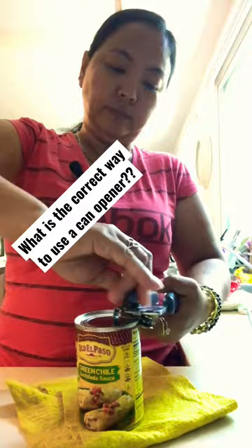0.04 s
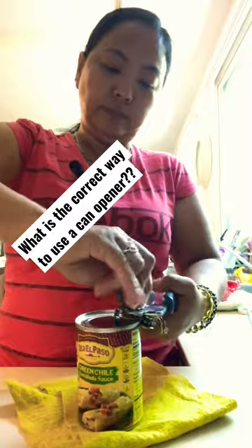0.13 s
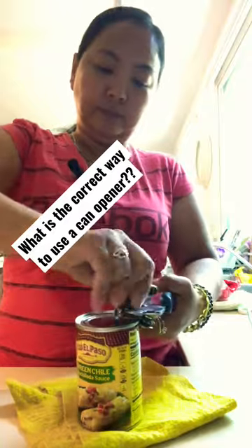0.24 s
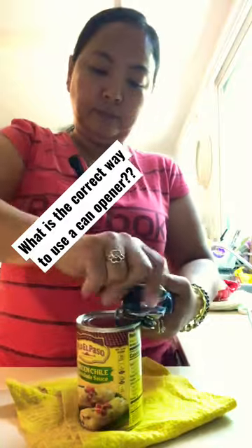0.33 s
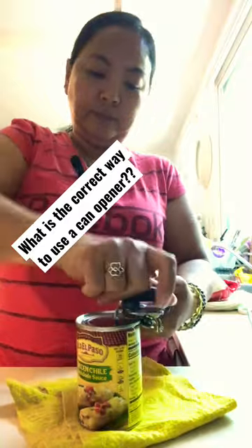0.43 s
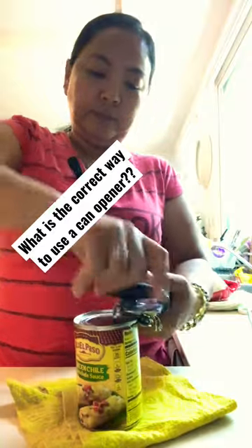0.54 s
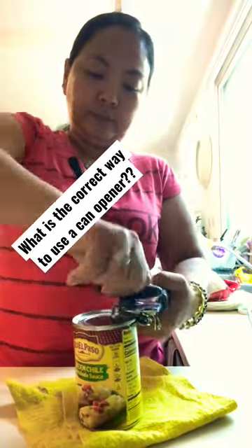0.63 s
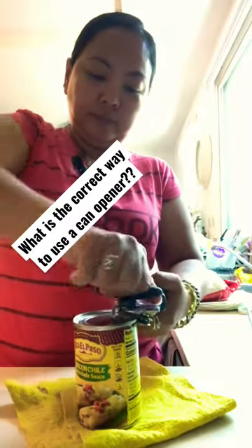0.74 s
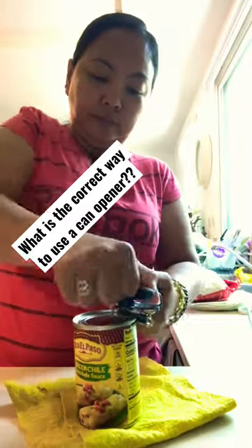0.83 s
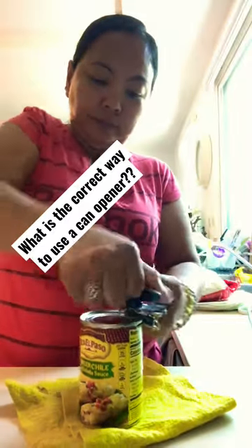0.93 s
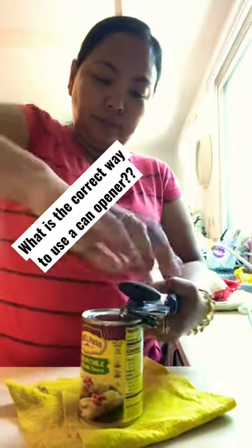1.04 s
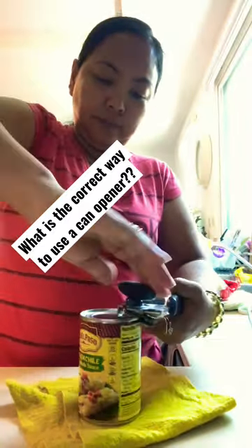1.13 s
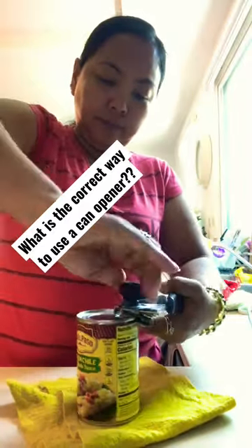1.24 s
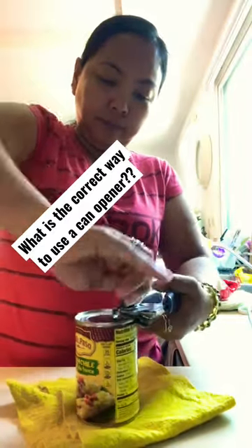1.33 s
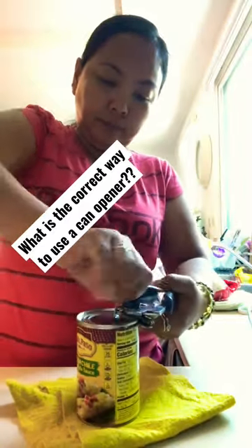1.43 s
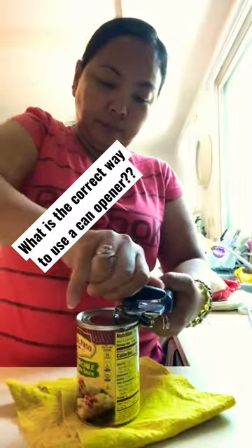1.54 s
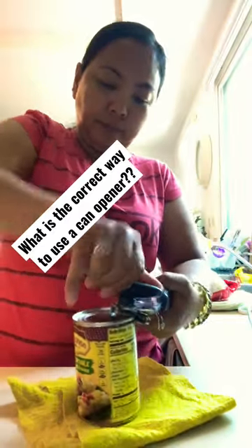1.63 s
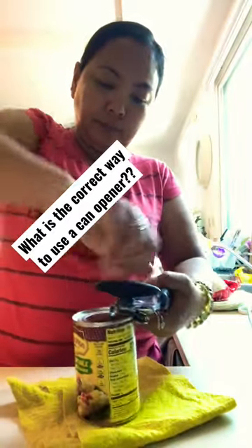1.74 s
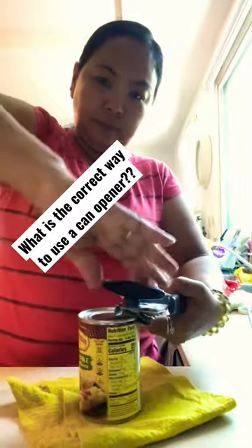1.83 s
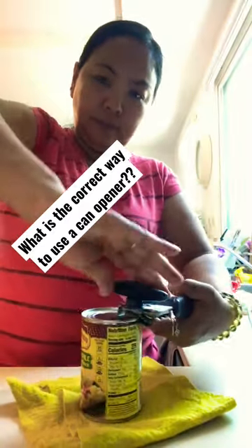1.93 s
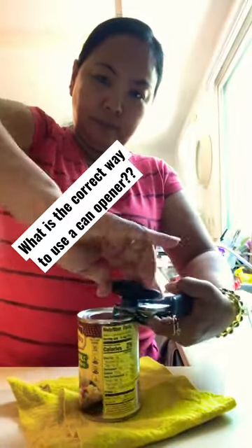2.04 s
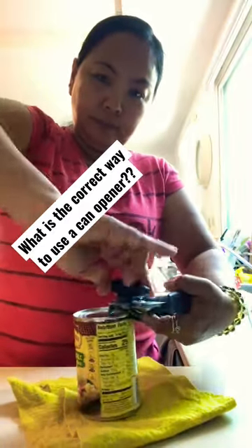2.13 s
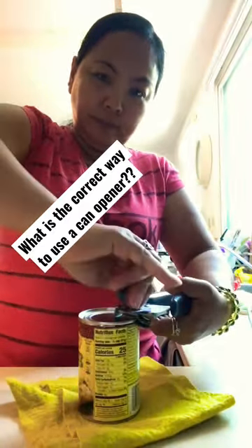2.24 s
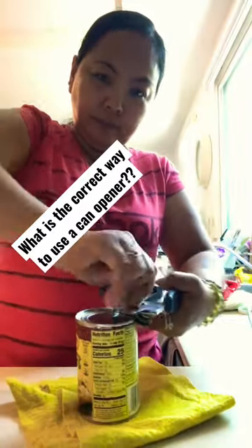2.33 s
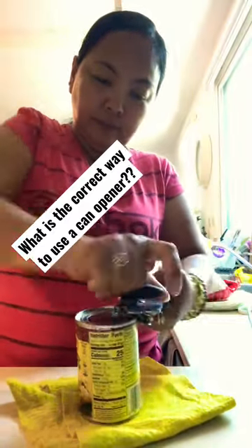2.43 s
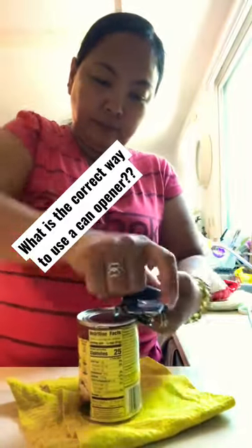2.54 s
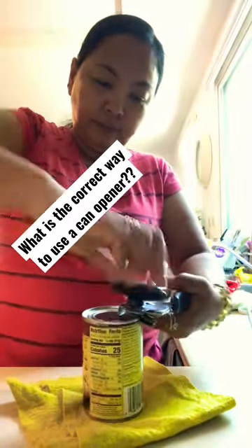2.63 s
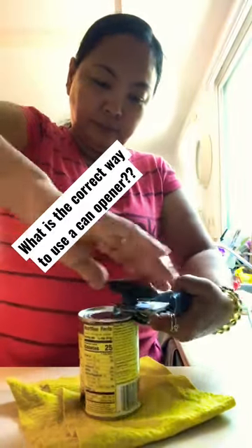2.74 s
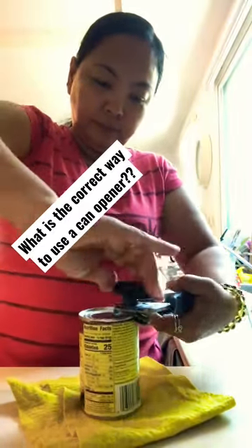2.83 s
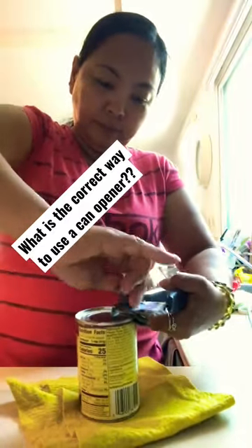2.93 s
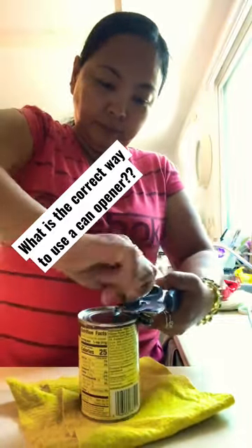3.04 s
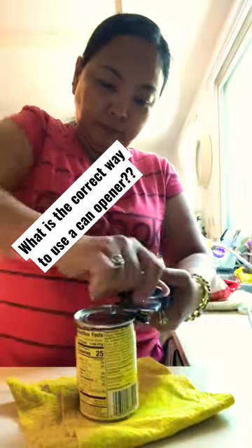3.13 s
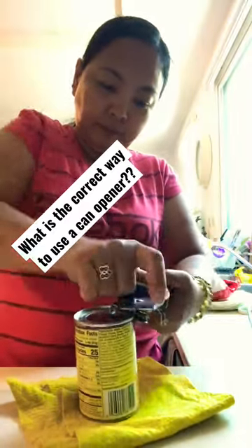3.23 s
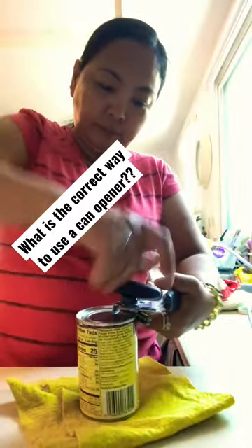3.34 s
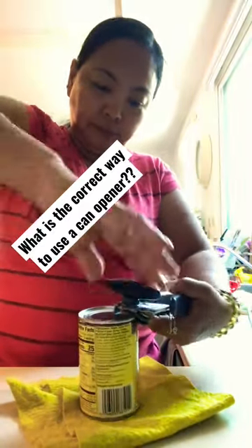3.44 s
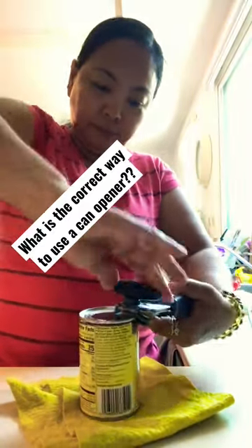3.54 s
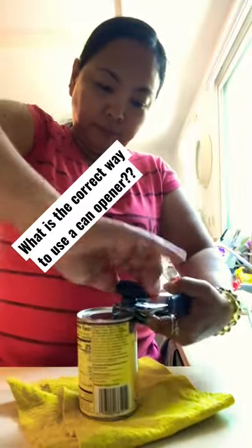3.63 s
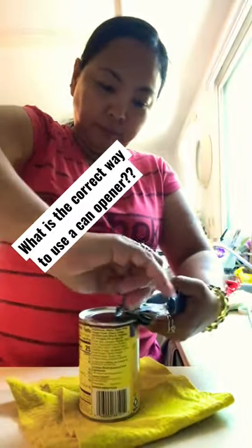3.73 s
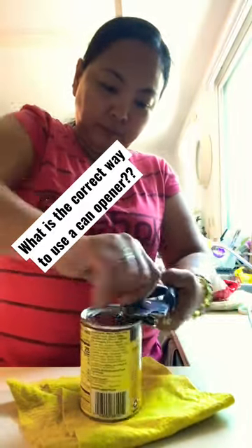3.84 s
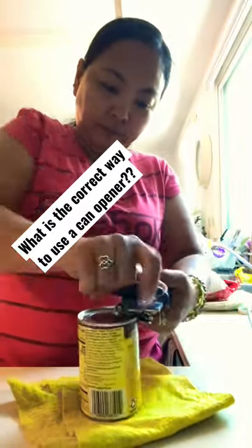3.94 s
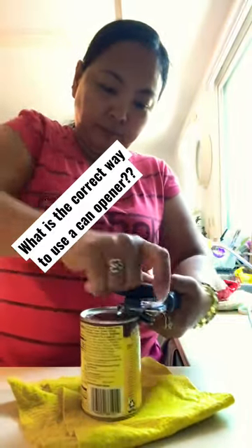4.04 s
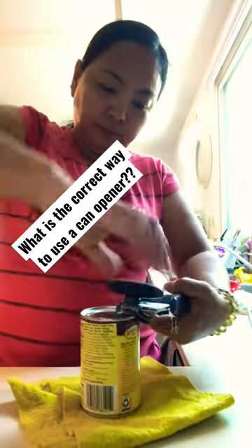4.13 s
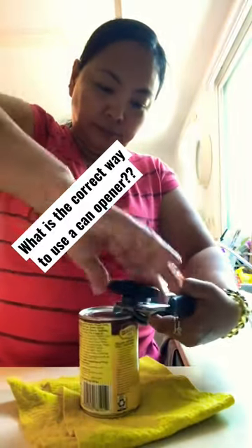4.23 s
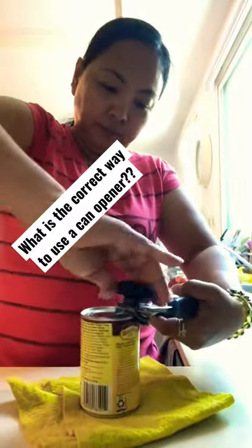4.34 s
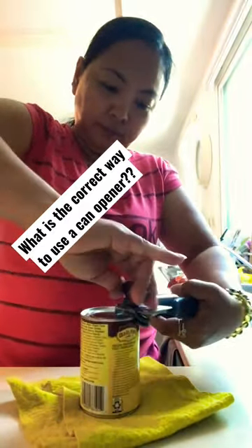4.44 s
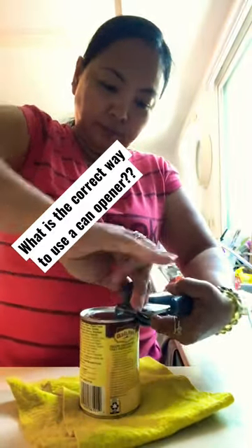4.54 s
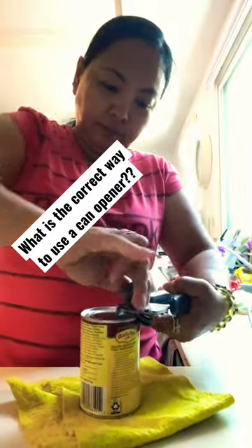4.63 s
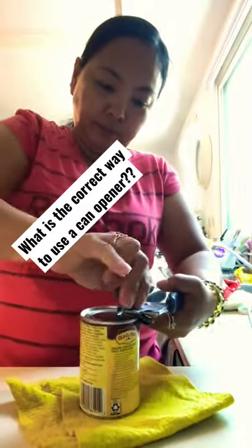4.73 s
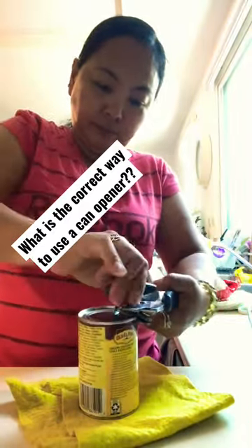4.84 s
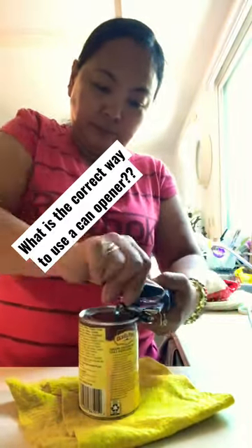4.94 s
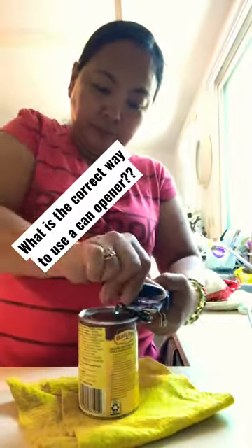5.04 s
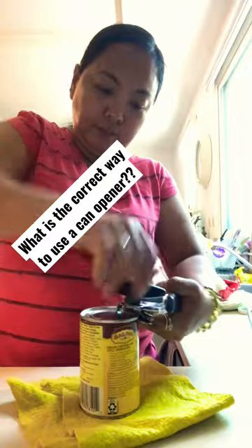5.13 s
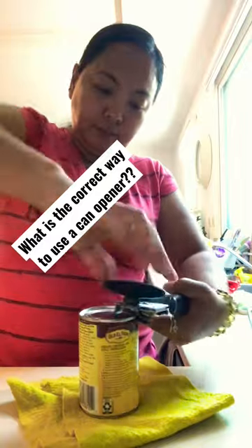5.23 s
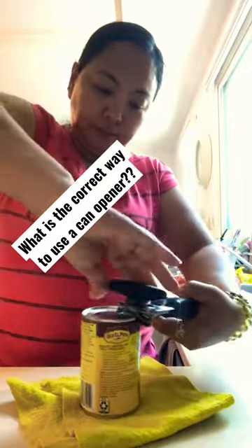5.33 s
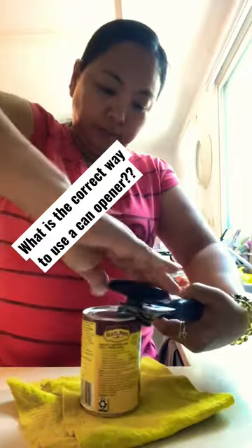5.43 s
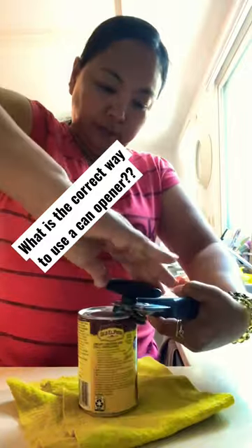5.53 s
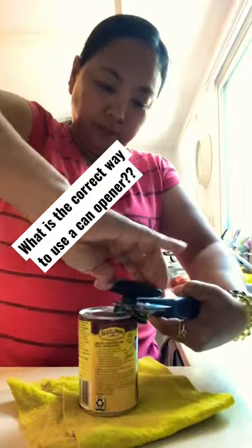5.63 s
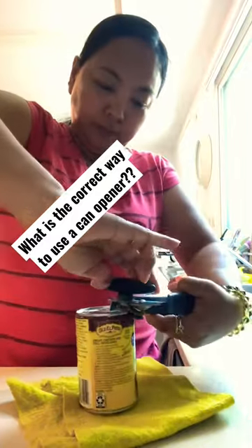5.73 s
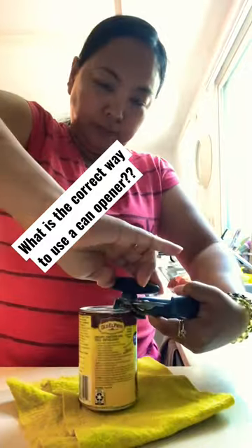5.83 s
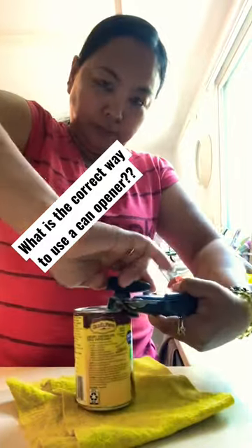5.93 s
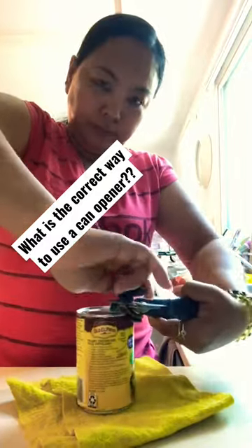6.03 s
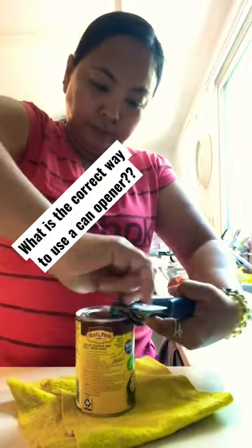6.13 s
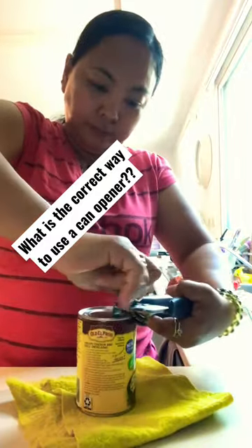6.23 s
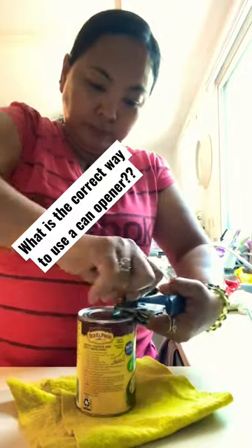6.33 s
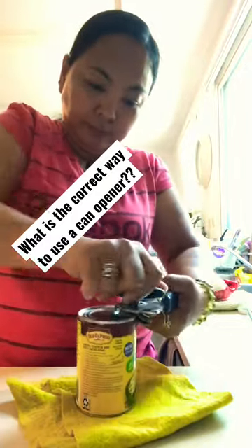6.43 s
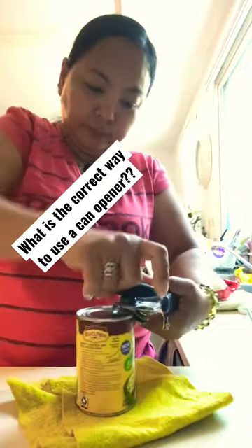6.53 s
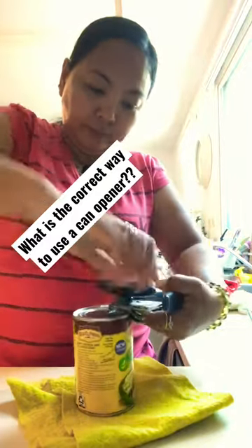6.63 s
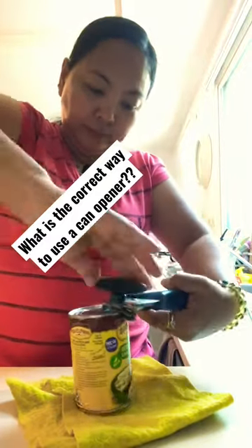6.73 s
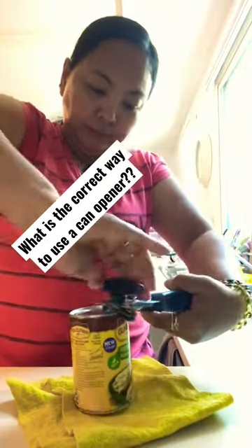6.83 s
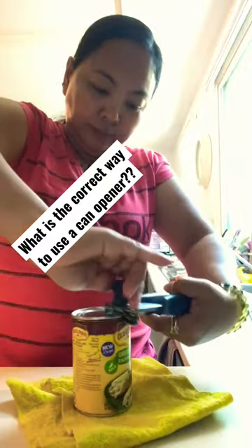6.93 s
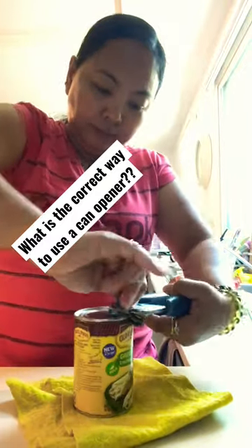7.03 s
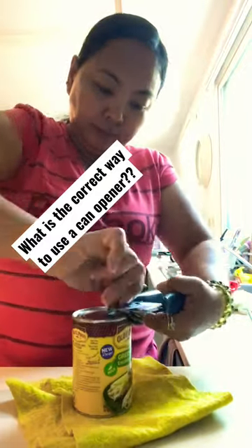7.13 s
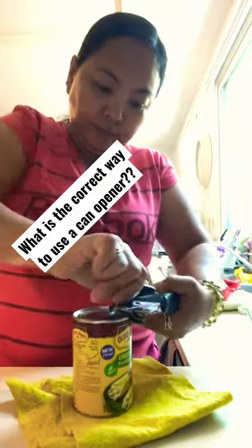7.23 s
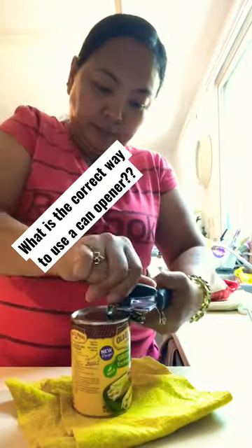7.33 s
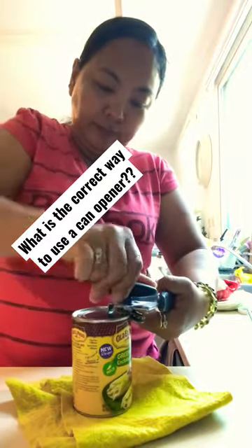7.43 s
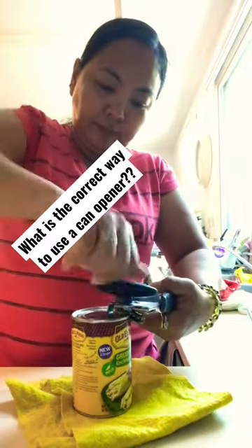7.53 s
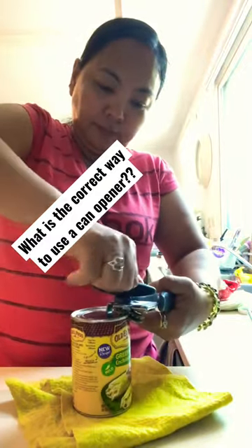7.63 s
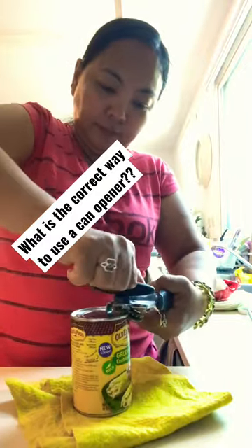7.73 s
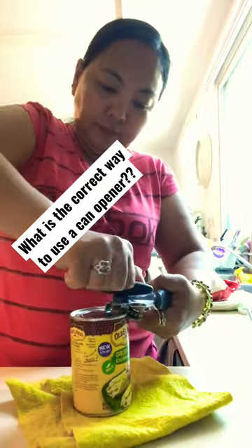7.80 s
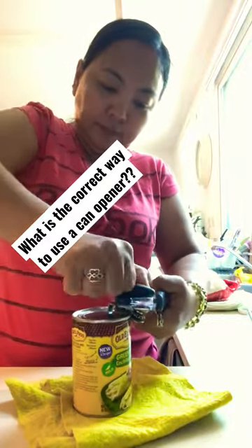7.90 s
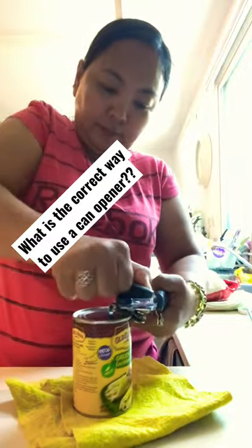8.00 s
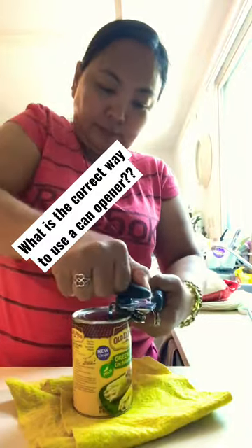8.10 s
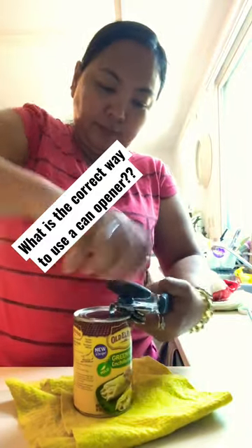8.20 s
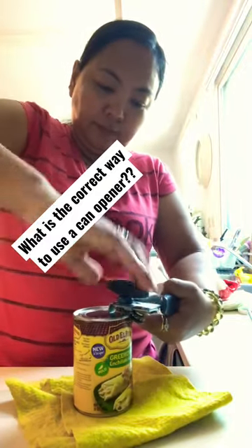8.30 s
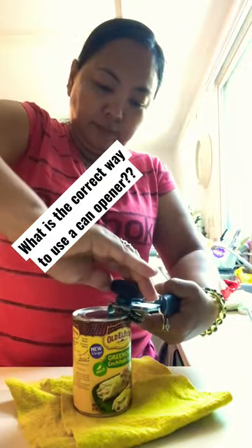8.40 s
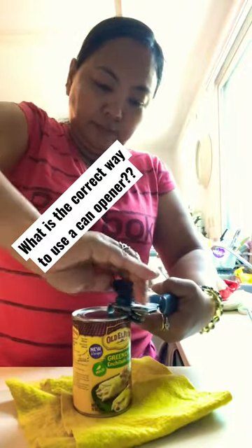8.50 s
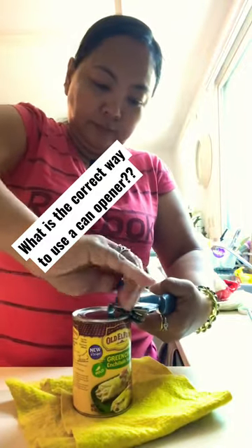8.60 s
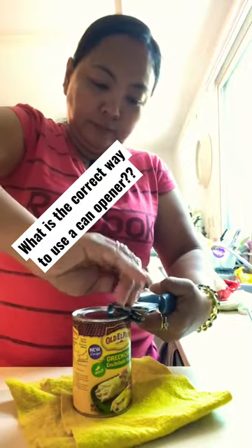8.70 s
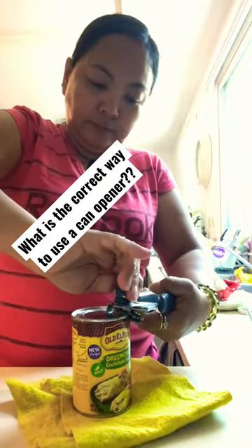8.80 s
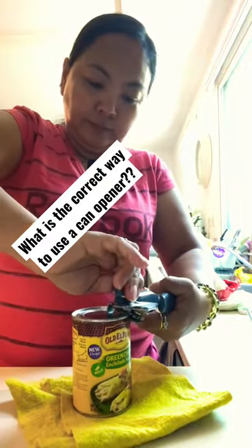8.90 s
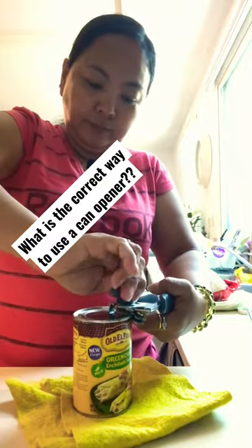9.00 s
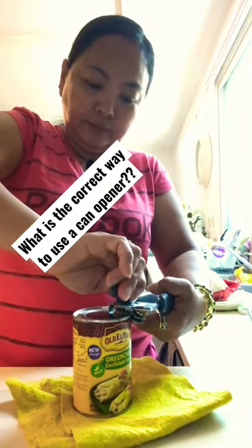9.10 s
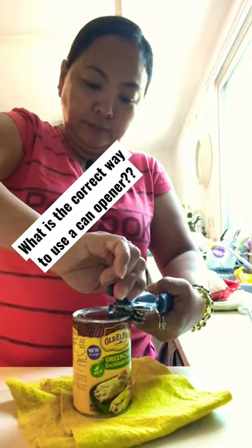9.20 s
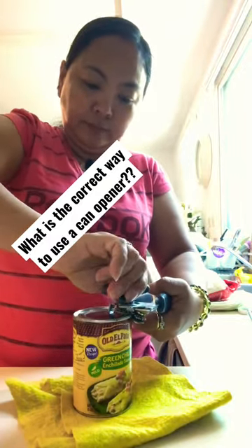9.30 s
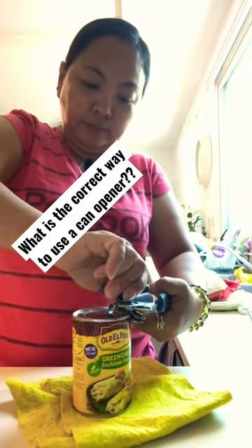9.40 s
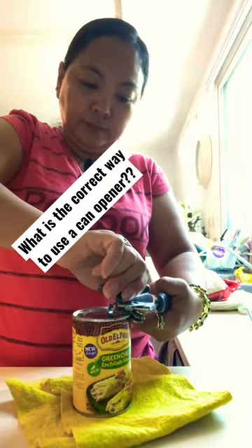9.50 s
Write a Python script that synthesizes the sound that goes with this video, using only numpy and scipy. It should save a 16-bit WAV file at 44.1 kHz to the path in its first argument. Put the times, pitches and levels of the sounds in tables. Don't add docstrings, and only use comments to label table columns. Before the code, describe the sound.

A faint low fridge hum and soft room air sit beneath a close manual can opener on a full tin. It begins with light ticks and faint scraping; at 0.85 s sharp, dry grip snaps crackle very close. From 1.3 to 1.6 s and 2.2 to 2.5 s come clusters of metallic clacks, gritty grinding and thin squeals. Harder clacks hit at 3.0 and 3.7-3.9 s, with dull table knocks. More arrive around 4.4-4.9 s. Soft bumps at 5.4 s are joined by a bright handle ring, repeated lightly at 5.85 s. A bump at 6.0 s leads to the hardest slip at 6.14 s, squealing and crunching until 6.5 s. Looser clack groups follow at 6.9-7.3, 7.9-8.1 and 8.5 s, then faint scrapes and a final bump at 9.55 s. Short kitchen echo, little deep bass.

```python
import sys
import numpy as np
from scipy import signal
from scipy.fft import rfft, irfft
from scipy.io import wavfile
from scipy.ndimage import uniform_filter1d

SR = 44100
rng = np.random.default_rng(int(sys.argv[2]) if len(sys.argv) > 2 else 0)


def to_wav(s):
    ch = np.atleast_2d(s).T
    pcm = np.round(np.clip(ch, -1, 1) * 32767)
    wavfile.write(sys.argv[1], SR, pcm.astype(np.int16))


def field_ratio(decibels):
    return 10 ** (np.asarray(decibels, dtype=float) / 20)


N = 421596

# pitch in Hz, level in dB, time to fade by 60 dB in seconds.
TIN_MODES = [(805, -6, 0.04), (892, -12.5, 0.0058), (1000, -12, 0.0083), (1130, -2.5, 0.0067),
             (1260, 2.5, 0.018), (1370, -12.5, 0.017), (1550, -26.5, 0.022), (1670, -3, 0.036),
             (1800, -16.5, 0.029), (1920, -17, 0.05), (2190, -5.5, .03)]
# pitch in Hz, level in dB, fade time in seconds.
STEEL_MODES = [(2290, -4.5, 0.028), (2900, 1.5, 0.017), (3180, 0, 0.015), (3755, -11.5, 0.024),
               (4360, -1.5, 0.014), (4475, -2, 0.0049), (5050, 5, 0.0091), (5734, -5, .009),
               (5882, -6, 0.022), (8200, -29, .008), (8700, -21, 0.0089), (9660, -8, 0.01)]
# pitch in Hz, level in dB, fade time in seconds.
HANDLE_MODES = [(1680, 0.5, 0.05), (2690, -0.5, 0.04), (3540, -8.5, 0.027), (4500, -6, 0.017),
                (5360, 3, 0.033), (6370, -1.5, 0.014), (6150, -8, 0.028), (8330, -5, 0.019),
                (9094, 1, 0.022), (10000, -11.5, 0.014), (10050, -28, 0.013)]
DENOISE_DB = 7


def rms_one(x):
    return x / np.sqrt(np.mean(x ** 2) + 1e-20)


def at_hz(points, hz):
    table_hz, value = np.transpose(points)
    return np.interp(np.log(hz), np.log(table_hz), value)


def band(x, low_hz, high_hz):
    return signal.sosfilt(signal.butter(2, [low_hz, high_hz], "band", fs=SR, output="sos"), x)


def highpass(x, hz):
    return signal.sosfilt(signal.butter(2, hz, "high", fs=SR, output="sos"), x)


def ring(force, hz, t60):
    decay = field_ratio(-60 / (max(t60, .004) * SR))
    turn = 2 * np.pi * hz / SR
    return signal.lfilter([0, np.sin(turn)], [1, -2 * decay * np.cos(turn), decay * decay], force + 1e-18)


def strike(times, contact_ms, hz, t60, gains_db, peak_db):
    t = np.arange(4096) / SR
    age = 1000 * t[:2048] / np.clip(contact_ms, .05, 9)[:, None]
    chatter = rng.standard_normal(age.shape) ** 3 * np.minimum(4 * age + 0.22, 1) * np.exp(-age)
    body = 0
    for mode_hz, mode_t60, mode_db in zip(hz.T, t60, gains_db.T):
        fade = field_ratio(-60 * t / max(mode_t60, .003))
        body = body + field_ratio(mode_db)[:, None] * fade * np.sin(2 * np.pi * mode_hz[:, None] * t)
    blows = signal.fftconvolve(body, chatter, axes=1)
    blows = blows * (field_ratio(peak_db) / np.abs(blows).max(axis=1))[:, None]
    at = np.round(times * SR).astype(int)[:, None] + np.arange(blows.shape[1])
    return np.bincount(at.ravel(), blows.ravel(), N)[:N]


def knocks(times, peak_db, modes, ms, spread_db, detune=0., shape_db=None):
    hz, mode_db, t60 = np.transpose(modes)
    luck = rng.standard_normal((len(times), 2, len(modes)))
    hz = hz * (1 + detune * luck[:, 0])
    gains_db = mode_db + spread_db * luck[:, 1]
    if shape_db:
        gains_db = gains_db + shape_db(hz)
    return strike(times, ms * np.ones(len(times)), hz, t60, gains_db, peak_db)


def room_tone():
    # pitch in Hz, rms level in dB.
    hum = [(53.8, -82.5), (150.7, -62.5), (301.5, -68), (527.6, -72), (753.7, -71)]
    # time in seconds, level in dB.
    hum_fade = [(0, 1), (2, 0), (4, 2), (6, 0), (9.56, 0.5)]
    # pitch in Hz, level in dB per Hz.
    air_colour = [(25, -34.5), (55, -20), (75, -32.5), (115, -40.5), (135, -8), (170, -1), (300, 1.5),
                  (500, -0.5), (800, -2.5), (1300, -4.5), (3100, -19), (4000, -26), (10000, -32),
                  (12000, -41.5)]
    air_db = -62
    hz = np.maximum(np.fft.rfftfreq(N, 1 / SR), 10)
    air = rms_one(irfft(rfft(rng.standard_normal(N)) * field_ratio(at_hz(air_colour, hz)), N))
    slow = uniform_filter1d(rng.standard_normal((len(hum) + 1, N)), size=4000)
    slow = rms_one(uniform_filter1d(slow, size=4000))
    t = np.arange(N) / SR
    tones = 0
    for (tone_hz, db), waver in zip(hum, slow):
        height = np.sqrt(2) * field_ratio(db - 4.5 + 0.33 * waver)
        tones = tones + height * np.sin(2 * np.pi * tone_hz * t + .5 * waver)
    fade = field_ratio(np.interp(t, *np.transpose(hum_fade)))
    return field_ratio(DENOISE_DB) * (field_ratio(air_db + 0.36 * slow[-1]) * air + fade * tones)


def table_rocks():
    # time in seconds, peak level in dB.
    rocks = [(0.076, -42), (0.184, -38.5), (0.296, -32), (0.374, -46), (0.859, -22), (1.328, -36),
             (1.408, -27), (1.481, -36.5), (1.583, -34.5), (2.48, -25.5), (3.021, -26), (3.192, -26.5),
             (3.705, -24.5), (3.862, -26.5), (3.95, -37.5), (4.399, -41.5), (4.721, -33), (4.946, -32),
             (6.037, -40.5), (6.266, -56.5), (6.466, -36), (6.942, -37), (7.025, -39), (7.127, -37.5),
             (7.258, -32), (8.505, -41), (9.223, -38.5), (9.547, -44)]
    # pitch in Hz, level in dB, fade time in seconds.
    table_modes = [(164.2, 13, 0.096), (188, 1.5, 0.024), (278, -6.5, 0.012)]
    s, db = np.transpose(rocks)
    return band(knocks(s, db - 5.5, table_modes, ms=8.0, spread_db=4.5), 80, 330)


def handle_touches():
    # time in seconds, peak level in dB.
    touches = [
        (5.3713, -20),
        (5.8399, -26),
        (5.8767, -35.5),
        (5.8987, -44),
    ]
    s, db = np.transpose(touches)
    rung = knocks(s, db + 0.5, HANDLE_MODES, ms=9.0, spread_db=2.0, detune=0.012)
    return band(rung, 1200, 13000)


def snaps():
    # time in seconds, height with its sign (full scale is 1).
    clicks = [
        (.8470, -.5),
        (.8491, -.14),
        (.8677, .3),
        (.8708, .55),
        (.8729, .3),
        (.8800, .14),
        (.8817, .28),
        (.8824, .14),
        (.8872, .24),
        (.8893, .1),
    ]
    force = np.zeros(N)
    for s, height in clicks:
        force[round(s * SR)] = height
    crackle = 0.033 * signal.lfilter([1], [1, -.975], np.abs(force)) * rng.standard_normal(N)
    edge = signal.lfilter([.5, .5], [1, -.55], force + crackle)
    rebound = signal.lfilter([1], [1, -.98], force)
    return edge + field_ratio(-8) * rebound


def squeals():
    # start in seconds, level in dB, pitch in Hz, fade time in seconds.
    songs = [(0, -49.5, 2130, 0.19), (0.08, -44.0, 709, 0.15), (0.078, -47.5, 1410, 0.34),
             (0.08, -57.0, 2123, 0.19), (0.081, -45.5, 2640, 0.075), (0.385, -50.5, 2238, 0.088),
             (1.48, -39.5, 2159, 0.51), (1.52, -46.0, 1680, 0.45), (1.82, -53.0, 2324, 0.18),
             (2.43, -43.0, 2143, 0.34), (3.031, -30.5, 1550, 0.5), (3.18, -37.5, 2260, 0.28),
             (3.19, -40.0, 1438, 0.45), (5.4, -40.5, 1000, 0.34), (5.482, -33.0, 481.6, 0.35),
             (6.152, -35.5, 1800, 0.82), (8.248, -44.5, 1680, 0.16), (8.519, -41.5, 1740, 0.48),
             (9.21, -48.5, 1800, 0.3), (9.261, -43.0, 1787, 0.24), (9.2, -63.0, 3420, 0.3),
             (1.475, -43.0, 2190, 0.12), (1.64, -54.0, 2190, 0.3), (2.312, -37.5, 2190, 0.15),
             (0.19, -54.5, 1500, 0.5), (4.74, -41.5, 1150, 0.4), (6.14, -40.5, 2900, 0.4),
             (7.94, -47.0, 1750, 0.5), (5.995, -51.0, 790, 0.12), (0.29, -60.0, 2200, 0.2),
             (8.25, -57.0, 3300, 0.15), (8.25, -65.5, 4250, 0.15), (4.73, -44.0, 1840, 0.5),
             (6.142, -21.0, 1800, 0.1), (4.72, -44.5, 3160, 0.4), (7.86, -47.0, 3390, 0.41),
             (1.33, -52.0, 2880, 0.31), (2.37, -47.5, 2950, 0.35)]
    ring_s, rise_s = .022, .004
    out = np.zeros(N + SR)
    t = np.arange(SR // 2) / SR
    drags = rng.standard_normal((len(songs), len(t))) ** 3
    for (s, db, hz, t60), drag in zip(songs, drags):
        sung = rms_one(ring(ring(drag, hz, ring_s), hz, ring_s / 2))
        start = round(s * SR)
        fade = field_ratio(db - 60 * t / max(t60, .05))
        out[start:start + len(t)] += fade * np.minimum(t / rise_s, 1) * sung
    return out[:N]


def effort():
    # start in seconds, hold in seconds, tin level in dB, bright scrape level in dB.
    pushes = [(0, 0.1, -57.5, -56.5), (0.325, 0.08, -67.5, -60.0), (0.768, 0.14, -60.5, -48.5),
              (1.31, 0.06, -45.0, -58.0), (1.424, 0.1, -38.0, -55.5), (2.187, 0.12, -38.0, -43.5),
              (2.329, 0.22, -38.0, -65.0), (2.92, 0.073, -37.5, -64.5), (3.028, 0.15, -29.0, -47.5),
              (3.19, 0.08, -44.0, -62.0), (3.709, 0.09, -42.0, -51.0), (3.806, 0.061, -32.0, -54.5),
              (4.41, 0.08, -47.0, -62.5), (4.577, 0.034, -56.5, -67.5), (4.73, 0.1, -44.5, -55.0),
              (4.912, 0.1, -56.0, -70.0), (5.409, 0.07, -37.5, -57.5), (5.49, 0.08, -43.5, -83.0),
              (6.015, 0.52, -43.5, -55.5), (6.917, 0.1, -43.0, -65.0), (7.057, 0.26, -42.5, -64.0),
              (7.26, 0.07, -43.5, -60.0), (7.88, 0.1, -43.5, -53.5), (8.001, 0.12, -40.5, -60.5),
              (8.213, 0.06, -52.0, -77.0), (8.511, 0.23, -68.0, -72.5), (9.241, 0.065, -56.5, -85.5)]
    bite_db_per_s, ease_db_per_s = 250.5, 183.5
    s, hold, *levels_db = np.transpose(pushes)[:, :, None]
    t = np.arange(0, N, 64) / SR
    shape_db = -bite_db_per_s * np.maximum(s - t, 0) - ease_db_per_s * np.maximum(t - s - hold, 0)
    return [np.interp(np.arange(N) / SR, t, (db + shape_db).max(axis=0)) for db in levels_db]


def grind():
    bodies = (TIN_MODES + STEEL_MODES[:3], STEEL_MODES[3:] + HANDLE_MODES[5:])
    out = 0
    for modes, level_db, teeth_per_s in zip(bodies, effort(), (3000, 8000)):
        sizes = field_ratio(2.7 * np.minimum(rng.exponential(1, N), 4)) * rng.choice([-1, 1], N)
        teeth = sizes * (rng.random(N) < teeth_per_s / SR) * field_ratio(level_db)
        dealt = rng.integers(0, len(modes), N)
        rung = 0
        for k, (hz, db, t60) in enumerate(modes):
            rung = rung + field_ratio(db) * ring(teeth * (dealt == k), hz, 0.52 * t60)
        out = out + rung * np.sqrt(np.mean(field_ratio(2 * level_db)) / np.mean(rung ** 2))
    return field_ratio(-15.5) * out


def contacts():
    tooth_jumps = [(0.384, -27.0, 1000, 2210, -5.0), (1.402, -20.0, 1690, 1020, -11.0),
                   (1.474, -11.5, 990, 2190, -18.5), (2.172, -19.0, 1290, 2120, 1.5),
                   (2.226, -19.5, 1390, 810, -12.0), (2.36, -17.5, 1280, 810, -15.0),
                   (2.423, -10.5, 1270, 820, -16.0), (2.957, -16.5, 1280, 770, -16.5),
                   (3.018, -3.5, 1380, 1820, -12.5), (3.156, -23.0, 1520, 1870, -13.0),
                   (3.179, -9.0, 1390, 2190, -26.0), (3.194, -24.0, 1380, 2230, -12.5),
                   (3.7014, 0.5, 1200, 1670, -14.5), (3.744, -3.5, 1000, 1300, -23.5),
                   (3.795, -20.0, 1200, 820, -18.5), (3.845, -8.0, 990, 1830, -30.0),
                   (3.888, -9.0, 790, 1300, -29.0), (4.44, -22.0, 1240, 1830, 0.5),
                   (4.46, -16.0, 1680, 730, -17.0), (4.714, -6.0, 1860, 1170, -16.0),
                   (6.152, -9.0, 1800, 1150, -13.5), (6.266, -22.5, 1180, 1850, -4.5),
                   (6.474, -31.0, 1150, 1520, -4.5), (6.904, -15.5, 1690, 1100, -10.5),
                   (6.937, -17.0, 1610, 2180, -7.5), (6.953, -14.5, 1180, 1710, -18.0),
                   (7.028, -9.0, 1820, 1140, -13.0), (7.148, -16.5, 1130, 1710, -41.0),
                   (7.254, -11.0, 920, 1320, -16.5), (7.354, -35.5, 820, 2210, -4.5),
                   (7.874, -12.0, 1280, 1700, -17.5), (8.056, -24.0, 1860, 1130, -15.5),
                   (8.507, -5.0, 1740, 1140, -18.0), (8.541, -21.0, 1710, 1150, -15.5),
                   (8.248, -26.0, 1290, 1690, -22.5), (8.259, -24.0, 1660, 1130, -24.0)]
    rim_slips = [(0.08, -31.5, 710, 1410, -15.5), (1.322, -18.5, 1680, 1360, -13.0),
                 (1.444, -21.5, 1000, 1870, -21.5), (2.192, -21.5, 1020, 1430, -16.5),
                 (2.276, -29.0, 790, 1410, -7.5), (2.472, -23.0, 1380, 2150, -11.5),
                 (2.914, -13.0, 1370, 1880, -13.0), (3.393, -44.5, 1910, 1550, -29.5),
                 (3.666, -24.0, 1150, 1750, -19.0), (3.672, -21.5, 1390, 980, -20.5),
                 (3.769, -24.5, 1130, 1570, -14.5), (4.396, -22.5, 1720, 750, -9.5),
                 (4.532, -31.0, 1810, 2210, 3.5), (4.706, -16.0, 1180, 1820, -20.5),
                 (4.917, -19.0, 1280, 1830, -20.0), (4.941, -28.0, 1180, 1560, -9.0),
                 (5.252, -37.0, 1010, 1320, -35.0), (6.1397, 1.0, 1780, 1180, -17.0),
                 (6.174, -15.5, 1800, 1330, -24.0), (6.184, -21.5, 1790, 1460, -22.5),
                 (6.249, -28.0, 1760, 2150, -12.0), (6.292, -21.0, 1340, 1850, -23.5),
                 (6.369, -16.0, 1140, 1710, -24.5), (6.387, -23.5, 1270, 970, -20.5),
                 (6.395, -23.5, 1880, 1340, -23.0), (6.427, -14.0, 1150, 1570, -15.5),
                 (6.986, -30.0, 1160, 1700, -16.5), (7.207, -26.0, 1130, 1700, -43.0),
                 (7.27, -24.0, 960, 1350, -11.0), (7.401, -36.5, 1250, 1630, -22.0),
                 (7.851, -15.5, 2000, 1680, -4.5), (8.033, -19.0, 1280, 1820, -12.5),
                 (8.516, -20.0, 1780, 1130, -15.0), (8.631, -29.5, 1210, 1810, -15.0),
                 (8.956, -25.0, 1150, 1800, -41.5), (9.001, -33.0, 1720, 1320, -19.5),
                 (9.212, -27.5, 1690, 1260, -44.5), (9.26, -36.5, 1870, 1410, -35.0)]
    tears = [(0.186, -36.5, 1430, 810, -7.0), (0.288, -40.0, 1280, 830, -12.0),
             (0.376, -41.5, 1270, 1590, -17.5), (0.802, -40.0, 1720, 1410, -7.5),
             (0.836, -26.5, 880, 1280, -12.5), (1.256, -38.0, 1210, 900, -36.5),
             (1.306, -31.5, 1800, 1330, -5.5), (1.821, -51.0, 2190, 1580, -21.5),
             (2.312, -25.0, 820, 2170, -16.5), (2.45, -27.0, 1090, 1390, -11.0),
             (2.888, -44.5, 1400, 730, -10.0), (3.01, -24.5, 760, 1200, -12.0),
             (3.088, -25.5, 1550, 770, -14.5), (3.923, -28.5, 1720, 770, -15.0),
             (4.699, -31.5, 1180, 1840, -5.0), (4.95, -31.0, 1860, 1320, -14.5),
             (5.786, -42.5, 1600, 1900, -26.5), (6.128, -15.0, 1270, 1790, -14.0),
             (6.3, -26.0, 1890, 1200, -18.5), (6.313, -29.0, 1270, 1780, -13.0),
             (6.943, -19.5, 1140, 1620, -17.5), (7.013, -20.0, 1150, 1680, -13.5),
             (7.113, -30.5, 1680, 1200, -31.5), (7.124, -18.0, 1130, 1690, -24.0),
             (7.288, -23.0, 1550, 1090, -20.0), (7.46, -39.0, 1360, 1710, -28.5),
             (8.029, -26.5, 1060, 1730, -15.0), (8.092, -36.0, 1560, 1870, -23.0),
             (8.121, -32.0, 1570, 1230, -26.0), (8.499, -27.5, 1390, 970, -21.5),
             (9.14, -37.0, 1310, 1720, -33.5), (9.509, -36.5, 890, 1580, -33.5)]
    thuds = [
        (0.001, -34.0, 870, 2070, -13.0),
        (1.57, -32.5, 810, 1640, -17.0),
        (4.549, -15.0, 1860, 710, -14.5),
        (5.396, -28.0, 1410, 1020, -27.5),
        (5.478, -18.0, 1620, 750, -37.5),
        (5.515, -20.0, 1630, 1000, -37.5),
        (5.992, -13.5, 1680, 810, -2.5),
        (8.64, -22.5, 1810, 1110, -15.5),
        (9.194, -39.5, 1200, 2250, -37.0),
        (9.555, -15.0, 1170, 1500, -19.5),
    ]
    kinds = ((tooth_jumps, 1.6), (rim_slips, 3.0), (tears, 8.5), (thuds, 4.5))
    blows = [(*row, ms) for rows, ms in kinds for row in rows]
    s, db, loud_hz, second_hz, steel_db, ms = np.transpose(blows)
    bump = np.isin(s, np.transpose(thuds)[0])
    wall_db = -19.5 + 0.66 * db - 1.1 * s + 7 * bump
    return s, db, loud_hz, second_hz, steel_db, ms, wall_db


def slips():
    # pitch in Hz, level in dB, fade time in seconds.
    wall_modes = [(455, -3, 0.11), (530, -9.5, 0.062), (633, -4.5, 0.013), (725, 7.5, 0.26)]
    crack_modes = [(3180, 1.5, 0.01), (4930, 3, 0.0037), (8600, -8, 0.006)]
    lid_t60_s, second_db = .024, -4.5
    s, db, loud_hz, second_hz, steel_db, ms, wall_db = contacts()
    pair = np.transpose([loud_hz, second_hz])

    def near_loud(hz):
        octaves = np.abs(np.log2(hz[:, :, None] / pair[:, None])).min(axis=2)
        return -9 * np.minimum(octaves, .8)

    lid = 0
    for hz, less_db in zip(pair.T, (0, second_db)):
        lid = lid + strike(s, ms, hz[:, None], [lid_t60_s], 0 * hz[:, None], db - 2.5 + less_db)
    tin = knocks(s, db - 5.5, TIN_MODES, ms, spread_db=2.5, detune=0.02, shape_db=near_loud)
    wall = knocks(s, wall_db, wall_modes, 0.63 * ms, spread_db=4.0, detune=0.012)
    steel = knocks(s, db + steel_db + 5, STEEL_MODES, 0.62 * ms, spread_db=3.0, detune=0.025)
    crack = knocks(s, db + steel_db + 3, crack_modes, 1.6 * ms, spread_db=3.0, detune=0.15)
    clack = band(band(lid + tin, 620, 2500), 620, 3200) + band(steel + crack, 1700, 8100)
    return clack + band(band(wall, 430, 570), 290, 640)


def kitchen(x):
    # pitch in Hz, time to fade by 60 dB in seconds.
    echo_t60 = [(150, 0.39), (700, 0.25), (2000, 0.28), (5000, 0.13), (10000, 0.22)]
    t = np.arange(SR // 2) / SR
    tail = 0
    for low_hz in 90 * 2. ** np.arange(7):
        octave = band(rng.standard_normal(len(t)), low_hz, 2 * low_hz)
        tail = tail + octave * field_ratio(-60 * t / at_hz(echo_t60, 1.4 * low_hz))
    tail = tail * np.clip((t - .003) / 0.0072, 0, 1)
    return signal.fftconvolve(x, tail / np.sqrt(np.sum(tail ** 2)))[:N]


def denoise(x):
    margin_db = -0.5
    spectra = signal.stft(x, nperseg=512, noverlap=384)[2]
    power = uniform_filter1d(np.abs(spectra) ** 2, size=9, axis=1)
    power = uniform_filter1d(power, size=5, axis=2)
    steady = np.percentile(power, 25, axis=2, keepdims=True)
    gain = np.maximum(1 - field_ratio(2 * margin_db) * steady / (power + 1e-20), field_ratio(-DENOISE_DB))
    return signal.istft(spectra * gain, nperseg=512, noverlap=384)[1][:, :N]


def scene():
    tin = slips() + band(grind(), 510, 12000) + handle_touches() + table_rocks() + squeals()
    close = snaps()
    echo = field_ratio(-12.5) * kitchen(tin + field_ratio(-20.0) * close)
    bass_cut = signal.cheby2(8, 45, 115, "high", fs=SR, output="sos")
    near = signal.sosfilt(bass_cut, tin + close + echo)
    return (near + room_tone())[None]


def roll_off(x):
    return signal.sosfilt(signal.butter(12, 16320, fs=SR, output="sos"), x)


def record(dry):
    gap_s = (8.5146, 8.5153)
    limit, tick = .75, .05
    clean = signal.sosfilt(signal.cheby2(12, 55, 11600, fs=SR, output="sos"), denoise(dry))
    held = clean / (1 + np.abs(clean / limit) ** 6) ** (1 / 6)
    held = clean + highpass(held - clean, 90)
    held = highpass(held, 45)
    dull = field_ratio(-40) * held + signal.sosfilt(signal.butter(4, 11000, fs=SR, output="sos"), held)
    start, end = round(gap_s[0] * SR), round(gap_s[1] * SR)
    dull[:, start:end] = 0
    dull[:, [start, end]] = tick
    return roll_off(dull)


dry = scene()
out = record(dry)
to_wav(out)
```